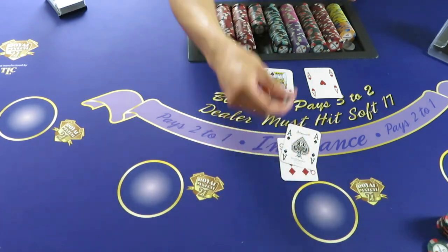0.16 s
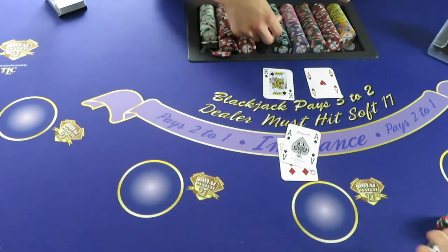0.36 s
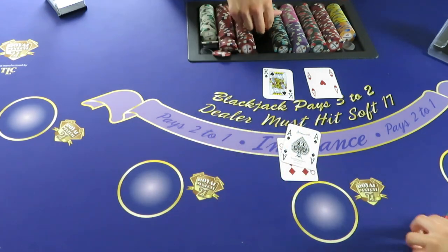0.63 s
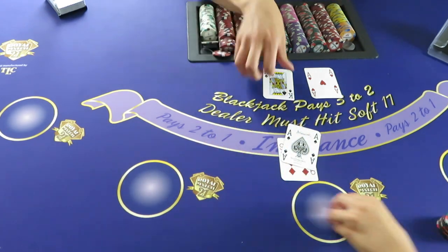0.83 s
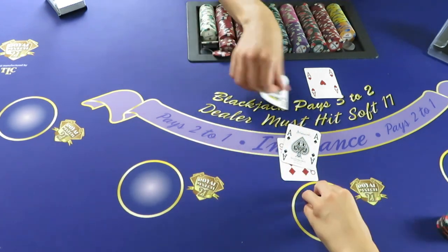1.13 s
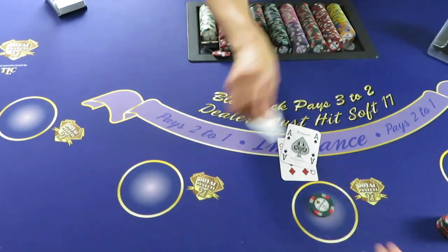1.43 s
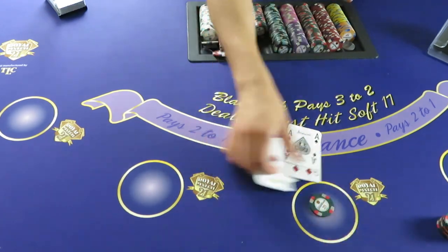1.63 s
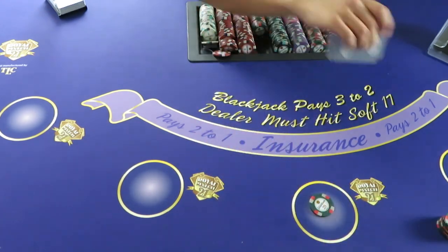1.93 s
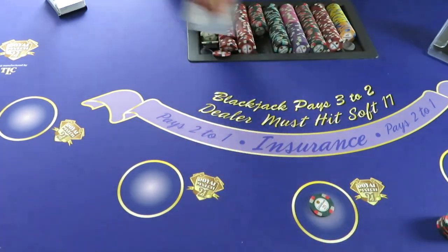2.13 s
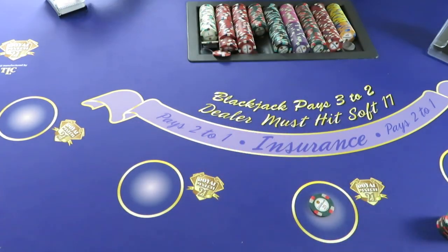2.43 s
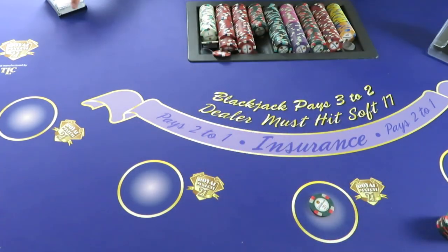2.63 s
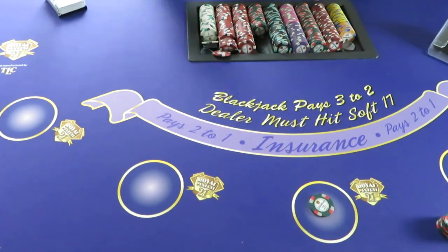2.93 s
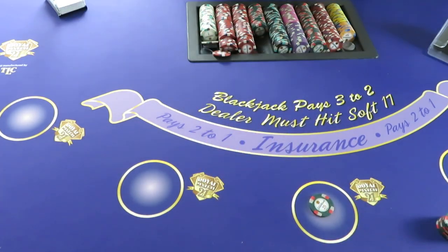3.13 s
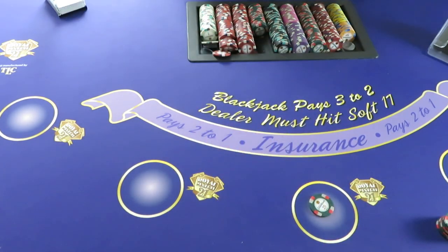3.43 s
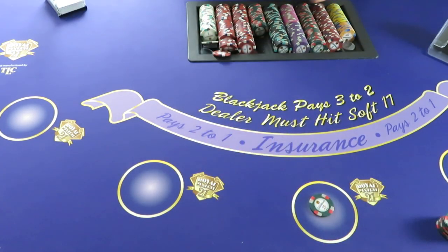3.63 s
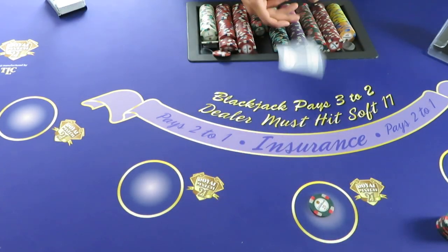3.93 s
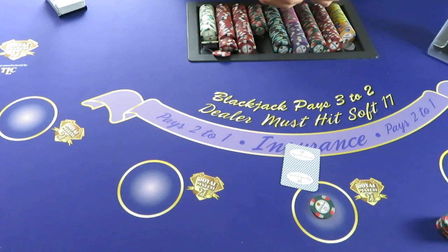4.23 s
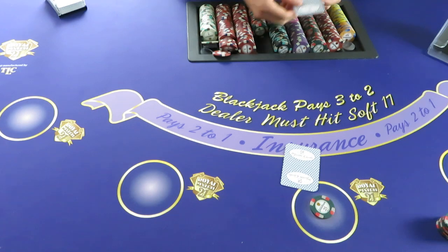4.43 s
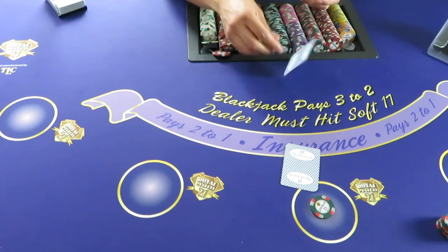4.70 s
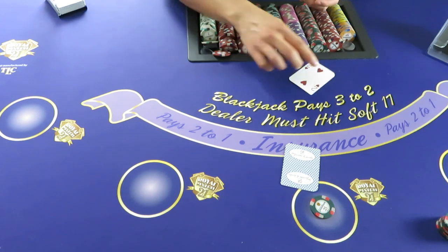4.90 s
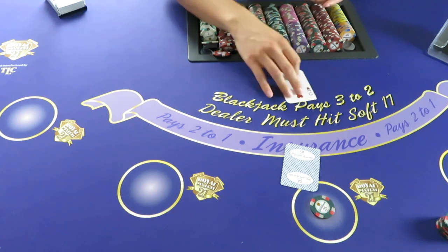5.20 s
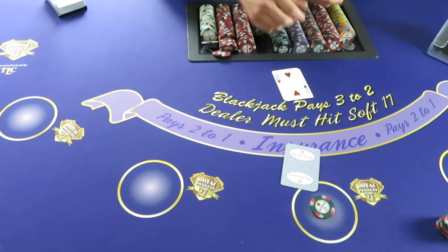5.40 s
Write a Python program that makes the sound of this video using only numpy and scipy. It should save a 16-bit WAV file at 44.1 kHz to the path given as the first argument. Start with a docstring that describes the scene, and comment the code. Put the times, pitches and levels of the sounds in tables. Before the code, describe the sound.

Soft felt rubbing leads to a sudden thumping chip drop, bright clicks and a quick rocking patter. Two or three dry card swishes follow, then a hard ringing plastic clack and a weaker one. After a near-quiet pause, a card snaps onto the felt and others land faintly. Small indoor room, short diffuse echo, steady air noise, boxy comb-coloured sound, nearly centred.

```python
"""Casino chips are swept over a felt table, click together and drop into a rack with a heavy table thump;
cards then slide, tap and clack into a plastic holder, and new ones are drawn and laid down.
Contacts are band-limited pushes on ringing modes plus rattle; rubbing is coloured noise shaped by hand speed.
Ventilation, a low hum and diffuse echoes fill the room. A gain control ducks after loud blows;
two feeds a few ms apart give a hollow comb colour."""
import sys
import numpy as np
from scipy import signal
from scipy.fft import rfft, irfft
from scipy.io import wavfile
from scipy.ndimage import uniform_filter1d

SR = 44100
rng = np.random.default_rng(int(sys.argv[2]) if len(sys.argv) > 2 else 0)


def wrap_up_sound(samples):
    """Save the sound to the file named by the first command line argument, as 16-bit audio."""
    columns = np.atleast_2d(samples).T
    # keep every value between -1 and 1, then stretch to whole-number steps
    tamed = np.clip(columns, -1, 1)
    steps = np.round(tamed * 32767).astype(np.int16)
    wavfile.write(sys.argv[1], SR, steps)


N = 245107
T = np.arange(N) / SR
RING = T[:SR * 3 // 5]  # time base of one impact or echo tail, s


def amp(db):
    """Decibels to gain."""
    return 10 ** (np.asarray(db) / 20)


def unit(x):
    """Scale to rms 1."""
    return x / np.sqrt(np.mean(x ** 2))


def band(x, hz, octaves, order=2):
    """Causal band-pass around a centre."""
    half_width = 2 ** (octaves / 2)
    edges_hz = np.clip([hz / half_width, hz * half_width], [10, 20], [.4 * SR, .45 * SR])
    return signal.sosfilt(signal.butter(order, edges_hz, "band", fs=SR, output="sos"), x)


def colour(x, points):
    """Give a noise a spectrum, interpolated over log frequency; rms 1."""
    hz, db = np.transpose(points)
    f = np.maximum(np.fft.rfftfreq(N, 1 / SR), 1)
    gain = amp(np.interp(np.log(f), np.log(hz), db))
    return unit(irfft(rfft(x) * gain, N))


def walk(rate_hz):
    """Smooth random wander with rms 1."""
    k = int(SR / rate_hz)
    steps = np.repeat(rng.standard_normal(N // k + 1), k)
    return unit(uniform_filter1d(steps, k)[:N])


def fade(t, t60):
    """Exponential decay, 60 dB down at t60."""
    return np.exp(-np.log(1000) * t / t60)


def room(gap_s=0.0029, build_s=0.0023, side_db=-20, treble_side_db=-1):
    """Stereo diffuse echoes: noise bands, each with its own decay, building up after a gap."""
    # reverberation time: f/Hz, t60/s
    room_decay = [(150, 0.68), (600, 0.41), (1500, 0.35), (3500, 0.54), (7000, 0.27), (14000, 0.28)]
    hz, t60 = np.transpose(room_decay)
    mid_side = np.zeros((2, len(RING)))
    for f in 62.5 * 2. ** np.arange(9):
        decay = fade(RING, np.interp(np.log(f), np.log(hz), t60))
        mid_side += band(rng.standard_normal((2, len(RING))), f, 0.86) * decay
    mid, side = mid_side
    side = amp(side_db) * side + amp(treble_side_db) * band(side, 9500, 1.0)
    onset = np.clip((RING - gap_s) / build_s, 0, 1)
    return np.array([mid + side, mid - side]) * onset / np.linalg.norm(mid * onset)


def body(modes, crack_db):
    """Impulse response of an object: the crack of the contact plus decaying modes."""
    response = amp(crack_db) * (RING == 0)
    for hz, db, t60 in modes:
        response = response + amp(db) * fade(RING, t60) * np.cos(2 * np.pi * hz * RING)
    return response


def strike(rows, response, room_db, rattle_db, rattle_t60):
    """Each contact pushes the object and sets off a rattle of tiny touches; a hard edge adds a bright tick."""
    out = np.zeros((2, N + SR))
    echo = signal.fftconvolve(response[None], room(), axes=1)[:, :len(RING)]
    heard = response + amp(room_db) * echo
    for s, db, hz, octaves, tick_db in rows:
        touches = unit(rng.standard_normal(len(RING)) ** 3)  # cubed: sparse peaks
        rattle = amp(rattle_db) * touches * fade(RING, rattle_t60) * (1 - fade(RING, 0.004))
        push = band(heard + rattle, hz, octaves, order=3)
        tick = amp(tick_db) * band(heard + rattle, 11000, 3.0)
        hit = push + tick
        start = int(s * SR)
        out[:, start:start + len(RING)] += amp(db) * hit / np.abs(hit).max()
    return out[:, :N]


def with_support(rows, weaker_db, hz, octaves, tick_db):
    """Every contact also gives whatever lies beneath a weaker, duller push."""
    return list(rows) + [(row[0], row[1] + weaker_db, hz, octaves, tick_db) for row in rows]


def strokes(rows):
    """Gain of hand strokes: half-sine speed from rest to rest, raised to a loudness power."""
    speed_power = 0.64
    gain = np.zeros(N)
    for start_s, length_s, db in rows:
        phase = np.pi * np.clip((T - start_s) / length_s, 0, 1)
        speed = np.maximum(np.sin(phase), 0)
        gain += amp(db) * speed ** speed_power
    return gain


def rub(rows, spectrum, grain, flutter_db):
    """Fibres catch and let go in countless tiny slips; the pressure flutters."""
    slips = rng.standard_normal(N) * np.exp(grain * rng.standard_normal(N))
    return colour(slips, spectrum) * strokes(rows) * amp(flutter_db * walk(60))


def air():
    """Steady ventilation noise: coloured mid and side, a little different left and right."""
    # relative spectra of mid and side: f/Hz, density/dB
    mid_spectrum = [(15, -23.5), (28, -1.5), (60, -3.5), (100, 3), (150, -5), (280, -3.5), (500, -6),
                    (1000, -11), (2000, -14), (2800, -17), (5000, -23), (8000, -29.5), (12000, -29),
                    (15000, -33)]
    side_spectrum = [(24, -53), (40, -18.5), (382, -5.5), (866, -24.5), (1960, -12.5), (2640, -32.5),
                     (3390, -17.5), (4340, -27.5), (15000, -40.5)]
    mid = colour(rng.standard_normal(N), mid_spectrum) * amp(-58.5 + .5 * walk(4.7))
    side = colour(rng.standard_normal(N), side_spectrum) * amp(-60)
    return np.array([mid + side, mid - side])


def hum():
    """Low sine that wavers in pitch and strength, swells, then stops."""
    # pitch track: t/s, f/Hz
    pitch_track = [(0, 84.4), (.62, 82.7), (.85, 90.5), (1.8, 98.2), (2.45, 96.5), (2.78, 88.6)]
    base_db, swell_peak_db, swell_s, waver_db = -60, 3, 0.27, 2.2
    stop_s, release_t60 = 2.78, 0.076
    t, hz = np.transpose(pitch_track)
    phase = 2 * np.pi * np.cumsum(np.interp(T, t, hz)) / SR
    swell_db = swell_peak_db * np.exp(-np.abs(T - stop_s) / swell_s)
    release = fade(np.maximum(T - stop_s, 0), release_t60)
    return unit(np.sin(phase)) * amp(base_db + swell_db + waver_db * walk(3.3)) * release


def felt_rubbing():
    """Hand and cards dragging over felt: grainy slip noise plus its room echo."""
    # hand sweeping chips, already under way at t = 0; then sliding cards: start/s, length/s, level/dB
    hand_sweep = [(-0.25, 0.63, -52)]
    card_slides = [(1.23, 0.24, -45), (1.555, 0.13, -46.5), (1.65, 0.24, -45), (1.93, 0.04, -59),
                   (4.135, 0.13, -58.5), (4.39, 0.18, -61.5), (4.58, 0.14, -63), (5.13, 0.28, -62.5)]
    # relative spectra: f/Hz, density/dB
    hand_spectrum = [(150, -28.5), (300, -7), (600, -9), (1200, -8), (2200, -7.5), (3600, -16),
                     (6000, -14.5), (9000, -21.5), (13500, -10), (15000, -24)]
    card_spectrum = [(250, -14), (500, -10.5), (1100, -7), (1800, -3.5), (2400, -2.5), (3400, -11),
                     (4300, -21), (6000, -23), (8300, -25.5), (11000, -19), (13500, -17.5), (15000, -26)]
    felt = rub(hand_sweep, hand_spectrum, grain=0.47, flutter_db=1.34)
    felt = felt + rub(card_slides, card_spectrum, grain=0.53, flutter_db=2.0)
    echo = signal.fftconvolve(felt[None], room(), axes=1)[:, :N]
    return felt + amp(-15.5) * echo


def chip_clicks():
    """Chip on chip: hard contacts with short high modes."""
    # contacts: t/s, level/dB, centre f/Hz, width/octaves, tick/dB
    clicks = [(.2190, -22.5, 8300, 1.6, -27), (.6096, -32.5, 7000, 1.26, -15),
              (.7190, -18.5, 2140, 0.78, -36.5), (.7315, -4.5, 2000, .94, -31), (.7425, -1, 7600, 2, -27),
              (.7440, -2, 4670, 2.7, -25)]
    # chip modes: f/Hz, level/dB, t60/s
    chip_modes = [(3540, -2.5, 0.026), (5930, -15, 0.035), (6180, -13, .06), (6820, -8, 0.12),
                  (8920, -8, 0.018), (10300, -6, 0.0092)]
    return strike(clicks, body(chip_modes, crack_db=19.0), room_db=-10, rattle_db=1.5, rattle_t60=0.047)


def rocking(count=3):
    """Last stack rocks to rest: evenly spaced knocks, each weaker than the one before."""
    start_s, gap_s = .8283, 0.016
    first_db, loss_db = -9.5, 0.5  # loss per knock
    hz, octaves, tick_db = 1370, 2.15, -56
    return [(start_s + gap_s * k, first_db - loss_db * k, hz, octaves, tick_db) for k in range(count)]


def rack_knocks():
    """Chips knocking into the rack: broad contacts exciting its damped modes."""
    # contacts: t/s, level/dB, centre f/Hz, width/octaves, tick/dB
    knocks = [(.6092, -20, 2100, 1.6, -28), (.6832, 14, 1050, 2.98, -27), (.6895, 7, 632, 1.3, -47),
              (.8071, 0.5, 1200, 1.18, -50), (.8182, 5, 1150, 1.22, -47)]
    # rack modes: f/Hz, level/dB, t60/s
    rack_modes = [(330, -11, 0.06), (560, -10, 0.11), (800, -7, 0.023), (1280, -6.5, 0.035),
                  (1558, -5, 0.043), (1730, -19, 0.1), (2100, -3.5, 0.032), (2450, -5.5, 0.02),
                  (3050, -8, .03)]
    rows = list(knocks) + rocking()
    return strike(rows, body(rack_modes, crack_db=32), room_db=-10.5, rattle_db=11.5, rattle_t60=0.056)


def table_bumps():
    """Hands bumping the padded table: modeless pushes, mostly low, with a strong room share."""
    # contacts: t/s, level/dB, centre f/Hz, width/octaves, tick/dB
    bumps = [(.6150, -41, 170, 3, -59), (.6330, -43, 114.3, 2.9, -63.5), (1.6500, -44.5, 70.5, 1.5, -58),
             (2.9150, -50, 500, 2.4, -38), (2.9680, -53, 287, 1.5, -65), (4.7080, -34.5, 616, 3.34, -22.5),
             (4.8170, -43, 151, 1.11, -44), (4.9250, -34, 575, 2.4, -38)]
    return strike(bumps, body([], crack_db=0.5), room_db=-1.5, rattle_db=-18.5, rattle_t60=0.052)


def table_thump():
    """Table under the heaviest chip drop: one wide, low, modeless push."""
    # contact: t/s, level/dB, centre f/Hz, width/octaves, tick/dB
    thump = [(.6838, 4.5, 71.7, 5.9, -58.5)]
    return strike(thump, body([], crack_db=-2), room_db=-20.5, rattle_db=-27.5, rattle_t60=0.12)


def card_taps():
    """Cards snapping and landing on felt: modeless contacts, each with a duller push beneath."""
    # contacts: t/s, level/dB, centre f/Hz, tick/dB
    taps = [(1.7486, -20, 1890, -31), (3.95, -40.5, 1950, -24), (4.1581, -37, 2100, -23),
            (4.2120, -12, 2216, -39), (4.4280, -45, 2800, -18), (4.454, -42, 2180, -26),
            (5.1780, -40, 2130, -26)]
    width_octaves = .9
    rows = [(s, db, hz, width_octaves, tick_db) for s, db, hz, tick_db in taps]
    rows = with_support(rows, weaker_db=-14.5, hz=1150, octaves=1.8, tick_db=-45)
    return strike(rows, body([], crack_db=5.5), room_db=-16.5, rattle_db=-22.5, rattle_t60=0.058)


def holder_clacks():
    """Cards striking the plastic holder: ringing modes, long rattle and a duller push beneath."""
    # contacts: t/s, level/dB, centre f/Hz, width/octaves, tick/dB
    clacks = [(2.4608, -25.5, 2800, 1.5, -24), (2.4775, -10, 2280, 0.46, -59),
              (2.4820, -4, 3080, 0.93, -20.5), (2.4933, -16.5, 1900, 2, -46),
              (2.8208, -21, 3250, 1.03, -26), (2.8650, -40, 2850, 0.41, -50)]
    # holder modes: f/Hz, level/dB, t60/s
    holder_modes = [(992, -2.5, 0.36), (1306, -11, 0.28), (1362, -17, 0.29), (2159, 16, 0.026),
                    (2300, -34, 0.21), (2200, -33, .05), (2805, 6, 0.069), (2936, 8.5, 0.068),
                    (3053, 18, 0.011), (3170, -32, .18), (3270, -14, 0.091), (3530, 1, 0.088),
                    (3935, -47, 0.064), (4770, -2, 0.063), (6260, 3, 0.127)]
    rows = with_support(clacks, weaker_db=-17.5, hz=1257, octaves=0.56, tick_db=-67)
    return strike(rows, body(holder_modes, crack_db=31.5), room_db=-17, rattle_db=6, rattle_t60=0.27)


def shoe_draws():
    """Faint rubs as cards leave the shoe: narrow-band noise following the hand speed."""
    # strokes: start/s, length/s, level/dB
    draws = [(2.98, 0.52, -66.5), (3.42, 0.64, -65)]
    friction = unit(band(rng.standard_normal(N), 2010, .3))
    return friction * strokes(draws) * amp(0.76 * walk(24))


def scene():
    """Sum of room background, rubbing and blows."""
    background = air() + hum()
    rubbing = felt_rubbing() + shoe_draws()
    chips = chip_clicks() + rack_knocks()
    table = table_bumps() + table_thump()
    cards = card_taps() + holder_clacks()
    return background + rubbing + chips + table + cards


def lag(x, seconds):
    """One-pole smoothing."""
    pole = np.exp(-1 / (seconds * SR))
    return signal.lfilter([1 - pole], [1, -pole], x)


def gain_control(x, threshold_db, release_db_per_s, sense_s, attack_s):
    """Gain drops quickly when the level passes the threshold and creeps back at a constant dB rate."""
    level_db = 10 * np.log10(lag(np.mean(x ** 2, axis=0), sense_s) + 1e-12)
    over_db = np.maximum(level_db - threshold_db, 0)
    release_db = release_db_per_s * T
    cut_db = np.maximum.accumulate(over_db + release_db) - release_db
    return x * amp(-lag(cut_db, attack_s))


def delay(x, seconds):
    """Delay by any fraction of a sample, as a linear phase shift."""
    f = np.fft.rfftfreq(N, 1 / SR)
    return irfft(rfft(x) * np.exp(-2j * np.pi * f * seconds), N)


def record(dry):
    """Dull clipped mono feed plus a later, brighter, softly saturated stereo feed: comb colour."""
    ceiling, dull_hz, top_hz = 0.24, 7000, 15600
    late_db, bright_db = -5.5, -8
    feed_lag_s, right_lag_s = .00377 + 2 / SR, .000018  # right_lag_s: right behind left
    x = gain_control(dry, threshold_db=-13.0, release_db_per_s=10.0, sense_s=0.0028, attack_s=0.0031)
    mono = signal.sosfilt(signal.butter(3, dull_hz, fs=SR, output="sos"), x.mean(axis=0))
    early = np.clip(mono, -ceiling, ceiling)
    stereo = np.tanh(2 * x) / 2
    stereo = amp(late_db) * stereo + amp(bright_db) * band(stereo, 9100, 0.76, order=1)
    left = delay(stereo[0], feed_lag_s - right_lag_s / 2)
    right = delay(stereo[1], feed_lag_s + right_lag_s / 2)
    top_cut = signal.ellip(8, .2, 70, top_hz, fs=SR, output="sos")
    return signal.sosfilt(top_cut, early + np.array([left, right]))


dry = scene()
out = record(dry)
wrap_up_sound(out)
```